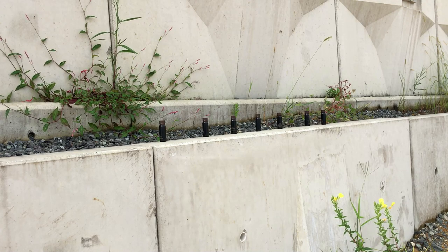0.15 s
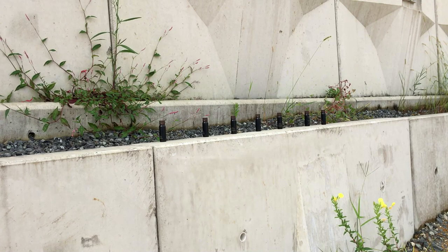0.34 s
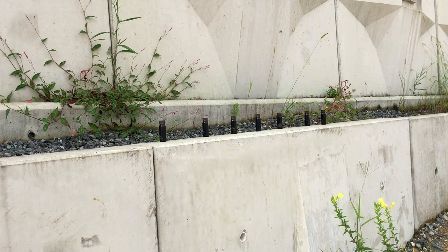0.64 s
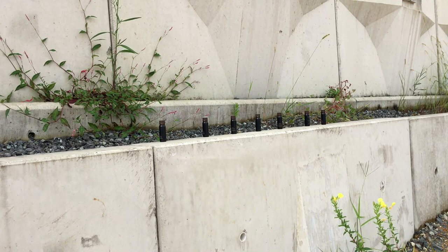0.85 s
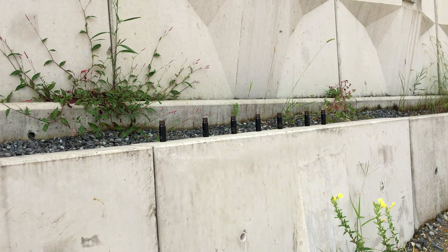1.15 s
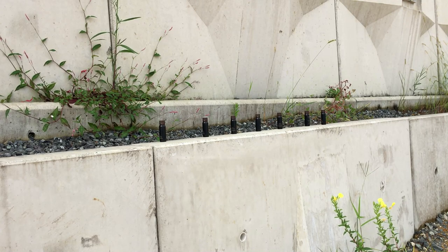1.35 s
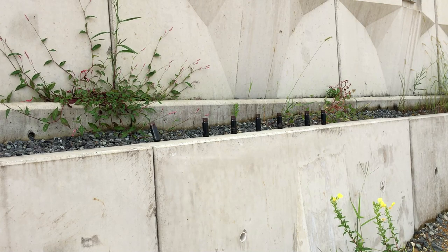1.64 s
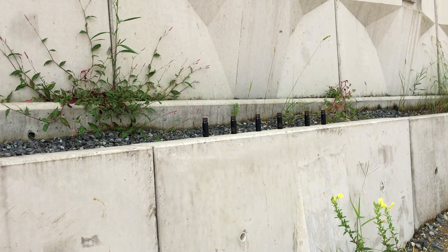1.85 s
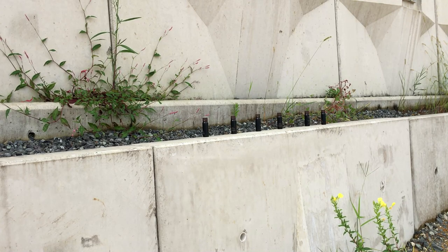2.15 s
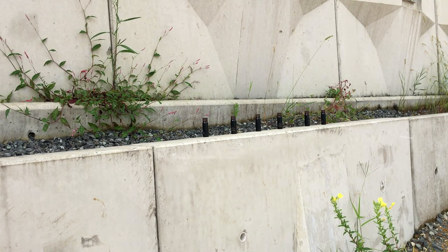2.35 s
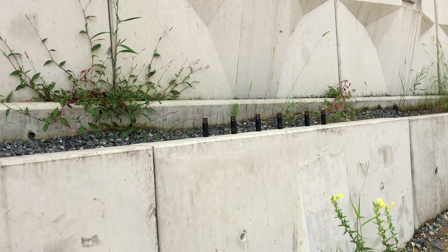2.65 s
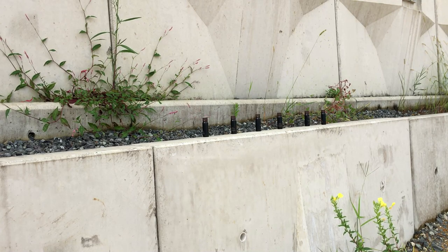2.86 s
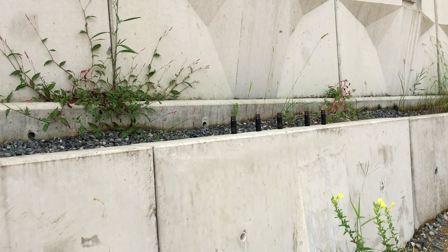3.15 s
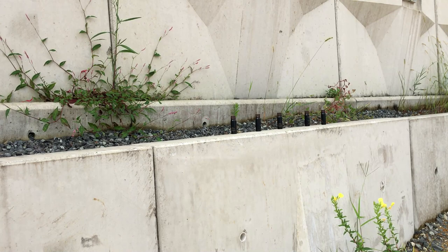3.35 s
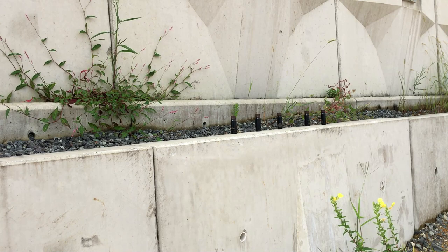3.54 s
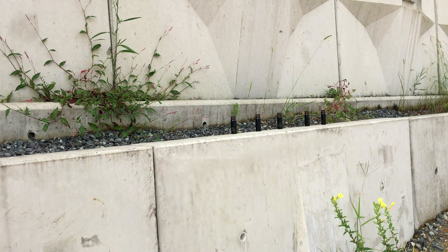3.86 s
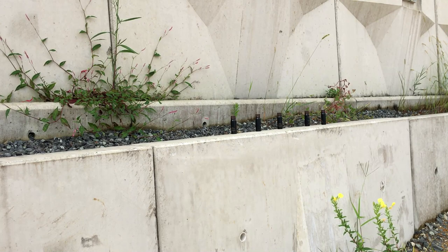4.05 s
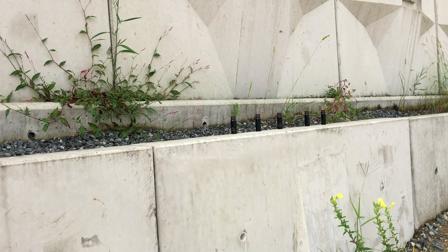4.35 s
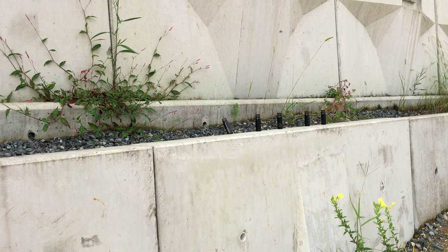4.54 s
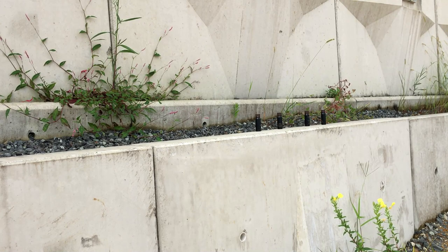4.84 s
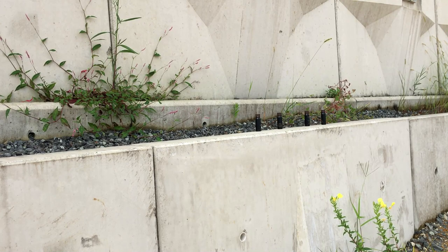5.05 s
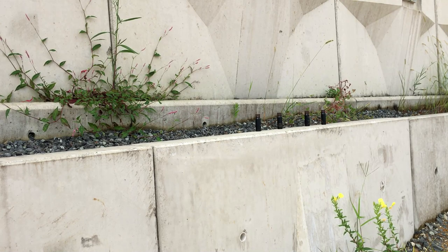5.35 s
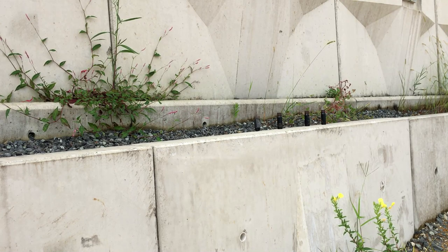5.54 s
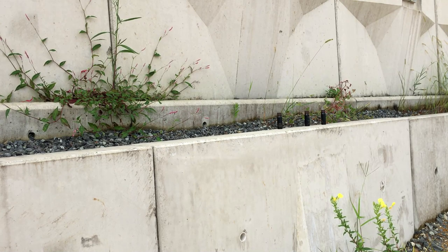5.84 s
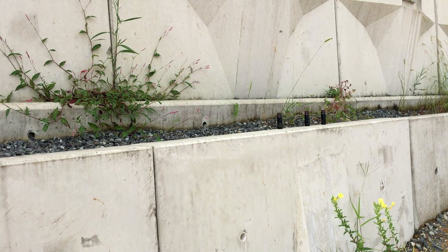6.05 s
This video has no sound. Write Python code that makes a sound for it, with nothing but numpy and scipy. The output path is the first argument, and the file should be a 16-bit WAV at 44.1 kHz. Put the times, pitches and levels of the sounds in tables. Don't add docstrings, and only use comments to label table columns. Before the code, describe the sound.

Short motor whirrs and hard plastic slams repeat at a distance; close pellet strikes snap on concrete and glass over faint town rumble and insects.

```python
import sys
import numpy as np
from scipy import signal
from scipy.fft import rfft, irfft
from scipy.io import wavfile
from scipy.ndimage import uniform_filter1d

SR = 44100
rng = np.random.default_rng(int(sys.argv[2]) if len(sys.argv) > 2 else 0)


def convert_level_to_amplitude(level_db):
    exponent = np.asarray(level_db, float) / 20
    return 10 ** exponent


def to_wav(sig):
    pcm = np.clip(np.atleast_2d(sig), -1, 1) * 32767
    pcm = np.round(pcm).astype(np.int16)
    wavfile.write(sys.argv[1], SR, pcm.T)


N = 273420
TIME = np.arange(N) / SR


def level(x, db):
    return x * convert_level_to_amplitude(db) / np.sqrt(np.mean(x ** 2))


def band(x, hz, width):
    return signal.lfilter(*signal.iirpeak(min(hz, SR / 2.2), hz / width, fs=SR), x)


def body(x, modes):
    out = 0
    for k, (hz, width, db) in enumerate(modes):
        strength = convert_level_to_amplitude(db) * np.sqrt(1000 / width)
        out = out + (-1) ** k * strength * band(x, hz, width)
    return out


def colour(points):
    hz, db = np.transpose(points)
    bins = np.arange(N // 2 + 1) * SR / N + 1
    gain = convert_level_to_amplitude(np.interp(np.log(bins), np.log(hz), db))
    return irfft(rfft(rng.standard_normal(N)) * gain, N)


def walk(rate):
    hold = int(SR / rate)
    steps = np.repeat(rng.standard_normal(N // hold + 1), hold)
    return uniform_filter1d(uniform_filter1d(steps, hold), hold)[:N]


def swells(rows):
    return sum(db * np.exp(-((TIME - s) / half) ** 2) for s, half, db in rows)


def add(out, s, piece):
    i = int(s * SR)
    out[..., i:i + piece.shape[-1]] += piece[..., :max(N - i, 0)]


def cycle(events, knocks, same=0.95, spark=0.75):
    push, t = np.zeros((4, N)), np.arange(4096) / SR
    shape_contact = spark * np.exp(-t / 0.0002)
    habit = rng.standard_normal((len(knocks), 4096))
    for s, db, *_ in events:
        for (delay, *parts, fade), usual in zip(knocks, habit):
            fresh = rng.standard_normal(4096)
            jolt = np.sqrt(min(same, 1)) * usual + np.sqrt(max(1 - same, 0)) * fresh
            shape = np.exp(-t / fade) + shape_contact
            add(push, s + delay, convert_level_to_amplitude(db + np.array(parts))[:, None] * jolt * shape)
    return push


# (time [s], peak level [dB])
SLAM_TIMES = [(0.9562, -17.5), (1.2783, -17), (1.515, -17), (2.395, -16.5), (2.7923, -16), (2.9908, -18),
              (3.6469, -17), (4.0261, -16.5), (4.4503, -16.5), (4.6578, -17.5), (5.2371, -17),
              (5.4429, -17.5), (6.1857, -16.5)]
# (time [s], peak level [dB], level of the rasp before it [dB])
LATCH_TIMES = [(0.881, -20.5, -14), (1.208, -20.5, -8), (1.4245, -20.5, -10.5), (1.6887, -21, -8.5),
               (2.503, -23, -11.5), (2.9062, -22, -7), (3.1054, -23.5, -4), (3.7493, -21, -15),
               (4.125, -22.5, -19), (4.563, -19, -12), (4.778, -20.5, -13.5), (5.3593, -22, -7),
               (5.5548, -20, -9)]
# (delay [s], stock [dB], receiver [dB], gearbox [dB], rattle [dB], fade [s])
SLAM_KNOCKS = [
    (-.006, -12, -17, -5, -10, .004),
    (-.0005, -6, -1, -4, -3, .007),
    (.007, -3, 0, -2, -4, .007),
    (.017, -1, -5, -9, -7, .008),
]
LATCH_KNOCKS = [
    (.0003, -12, -1, 0, -6, .005),
    (.008, -8, -4, -2, -6, .007),
    (.042, -15, -26, -30, -30, .014),
]
# (time [s], peak level [dB])
WALL_RETURNS = [(0.198, -43), (1.8248, -39), (1.8697, -45), (2.6237, -43.5), (3.2106, -46), (3.876, -40.5),
                (4.2493, -42), (4.8963, -39), (5.6702, -42)]
# (stock, receiver, gearbox, rattle [dB])
WALL_TILT_DB = [0, 2, -5, -8]


def gun_push():
    push = cycle(SLAM_TIMES, SLAM_KNOCKS) + cycle(LATCH_TIMES, LATCH_KNOCKS, same=.6, spark=2.5)
    echoes = cycle(WALL_RETURNS, LATCH_KNOCKS, same=.3, spark=.5)
    push += convert_level_to_amplitude(np.array(WALL_TILT_DB))[:, None] * echoes
    t = np.arange(1300) / SR
    part_db = np.array([[-10.], [-14.], [-6.], [3.]])
    for s, db, rasp_db in LATCH_TIMES:
        rasp = np.minimum(t / 0.019, 1) * rng.standard_normal(1300)
        add(push, s - 1300 / SR, convert_level_to_amplitude(db + rasp_db + part_db) * rasp)
    return push


# (frequency [Hz], width [Hz], level [dB])
STOCK_MODES = [(275, 30, -18.5), (430, 80, -13.5), (644, 21, -14), (944, 120, -8), (1092, 24, -9.5),
               (1203, 70, -5), (1537, 120, -11)]
RECEIVER_MODES = [(1950, 50, -7), (2090, 70, -10), (2230, 60, -5), (2330, 65, 1), (2500, 60, -10),
                  (2710, 80, -10)]
GEARBOX_MODES = [(3180, 180, -3.5), (3543, 130, -4), (3753, 116, -7.5), (4080, 280, -2.5),
                 (5300, 1800, -9.5), (6790, 980, -4.5)]
RATTLE_MODES = [(5560, 9700, -0.5), (8440, 1900, -4), (12900, 1400, -17)]


def gun():
    parts = (STOCK_MODES, RECEIVER_MODES, GEARBOX_MODES, RATTLE_MODES)
    return sum(body(push, modes) for push, modes in zip(gun_push(), parts)) + whirr()


# (start [s], length [s], level [dB])
MOTOR_RUNS = [(0, 0.063, -51), (.845, 0.14, -47), (1.005, 0.09, -55), (1.174, .15, -48), (1.363, 0.19, -49),
              (1.609, 0.1, -49.5), (2.347, 0.17, -47.5), (2.736, 0.2, -48.5), (2.946, .18, -48.5),
              (3.591, 0.17, -47), (3.981, 0.13, -47), (4.083, 0.055, -46.5), (4.415, 0.16, -48),
              (4.596, 0.21, -50), (5.142, 0.046, -59), (5.177, 0.23, -47.5), (5.392, 0.18, -48.5),
              (6.13, 0.059, -46.5)]
# (frequency [Hz], density [dB per Hz])
GEAR_SPECTRUM = [(350, -37.5), (600, -19.5), (1070, -7), (1450, -9.5), (2310, -10.5), (2910, -13.5),
                 (3160, -16), (6730, -17.5), (16000, -36)]


def whirr():
    spin_up_s, coast_s = .022, 0.036
    run = 0
    for start, length, db in MOTOR_RUNS:
        coast = np.exp(-np.maximum(TIME - start - length, 0) / coast_s)
        run = np.maximum(run, convert_level_to_amplitude(db) * np.clip((TIME - start) / spin_up_s, 0, 1) * coast)
    teeth = level(colour(GEAR_SPECTRUM), 0) * convert_level_to_amplitude(2.0 * walk(150))
    snags = rng.standard_normal(N) * convert_level_to_amplitude(6 * walk(60))
    hum = level(body(snags, STOCK_MODES[3:] + RECEIVER_MODES + GEARBOX_MODES), -5)
    return run * (teeth + hum)


# (time [s], spike level [dB], bending wave level [dB], fizz level [dB])
CONCRETE_STRIKES = [
    (1.081, -6.9, -37.2, -27.1),
    (1.4006, -7.5, -33.4, -20.6),
    (2.516, -11.6, -39.9, -34.0),
    (2.914, -4.2, -25.3, -30.6),
    (3.7712, -4.2, -25.6, -32.2),
    (4.1517, -3.7, -24.8, -30.4),
    (4.7824, -9.0, -35.6, -32.8),
    (5.3659, -6.1, -30.0, -29.8),
]


def concrete():
    spike_s, swing_s, swing_ratio = .000025, .00007, 3.7
    out, t = np.zeros(N), (np.arange(1024) - 8.3) / SR
    spike = ((t / spike_s) ** 2 - 1) * np.exp(-(t / spike_s) ** 2 / 2)
    late = np.maximum(t / swing_s, 1)
    swing = np.sin(np.pi * np.log(late) / np.log(swing_ratio))
    swing = swing * late ** -.6 * np.exp(-t / .003)
    fizz_fade = (t > 0) * (np.exp(-t / .0007) + .12 * np.exp(-t / 0.01))
    for s, spike_db, swing_db, fizz_db in CONCRETE_STRIKES:
        fizz = np.diff(rng.standard_normal(1025)) * fizz_fade
        hit = convert_level_to_amplitude(spike_db + 2) * spike + convert_level_to_amplitude(swing_db + 20) * swing + convert_level_to_amplitude(fizz_db) * fizz
        add(out, s - 8 / SR, hit)
    return out


def splinters(events, top=0.58, grit_s=0.012, grit_db=-26):
    out, t = np.zeros(N), np.arange(3000) / SR
    crack_fade = np.exp(-t / .0006)
    rebound_fade = np.exp(-t / .0005) + .6 * np.exp(-t / .0022)
    for s, db, hz, low_db, rebound_db in events:
        chance = rng.standard_normal((5, 3000))
        ring = band(band(chance[:2], hz, hz / 4), hz, hz / 4)
        low = convert_level_to_amplitude(low_db) * band(chance[2:4], 2500, 1700)
        bright = top * band(chance[:2], 13070, 5000) + 1.5 * ring + 2.2 * low
        bright = np.array([crack_fade, rebound_fade]) * bright
        crack, rebound = bright / abs(bright).max(axis=1, keepdims=True)
        grit = convert_level_to_amplitude(grit_db) * np.diff(chance[4], prepend=0) * np.exp(-t / grit_s)
        add(out, s - .0002, convert_level_to_amplitude(db) * (crack + grit))
        add(out, s + .0018, convert_level_to_amplitude(db + rebound_db) * rebound)
    return out


# (time [s], crack level [dB], ring [Hz], low part level [dB], rebound level [dB])
BOTTLE_HITS = [
    (.051, -5, 7600, -23, -8),
    (1.626, -4.5, 8900, -23, -1),
    (3.1031, -5.5, 6900, -30, 0),
    (4.5637, -4, 8600, -16, -2),
    (5.5564, -4.5, 9600, -18, -4),
]


def bottle_cracks():
    return splinters(BOTTLE_HITS)


# (time [s], frequency [Hz], level [dB], fade [s])
BOTTLE_TONES = [
    (.051, 400, -27, .0015),
    (.053, 3700, -29, .004),
    (1.627, 4640, -21, .004),
    (1.628, 2190, -33, .006),
    (3.104, 6890, -21, .003),
    (3.259, 3300, -38, .004),
    (4.5637, 500, -22, .002),
    (4.565, 3570, -28, .005),
    (5.5564, 500, -29, .002),
    (5.558, 3720, -28, .005),
]


def bottle_notes():
    out, t = np.zeros(N), np.arange(6000) / SR
    for s, hz, db, fade in BOTTLE_TONES:
        add(out, s, convert_level_to_amplitude(db) * np.sin(2 * np.pi * hz * t) * np.exp(-t / fade))
    scrape = band(rng.standard_normal(6000), 3760, 150) * np.exp(-t / .04)
    add(out, 4.145, convert_level_to_amplitude(-19) * scrape)
    return out


# (time [s], crack level [dB], ring [Hz], low part level [dB])
GRAVEL_BOUNCES = [(0.0978, -29.5, 9100, -28), (0.2127, -25.5, 5900, -2), (.2464, -43, 5900, 15),
                  (.383, -44, 4700, 14), (.5554, -48.5, 6220, -5), (1.1858, -29.5, 5000, -4),
                  (1.9001, -32.5, 6230, 24), (1.9192, -50, 6380, -11), (1.934, -42, 5950, 2),
                  (2.092, -49, 5070, -12), (2.9269, -27, 11600, -24.5), (3.1636, -35, 7150, -25),
                  (3.259, -26, 9250, -2), (3.435, -34, 9000, -0.5), (3.4858, -47, 6360, -17),
                  (3.5867, -38, 7443, 4), (3.8466, -38.5, 9400, -26), (4.1074, -33, 4500, -7),
                  (4.115, -38, 6500, 14), (4.6247, -29.5, 6260, -9), (4.6454, -35.5, 5180, -4),
                  (5.576, -20, 11800, -29), (5.619, -41, 10760, -18), (5.7893, -28.5, 4740, -13.5),
                  (5.867, -51, 6540, -6), (5.9104, -43, 6060, -3), (5.935, -41, 4580, -2),
                  (6.0405, -48.5, 4526, -8)]


def gravel_bounces():
    events = [(*row, -6) for row in GRAVEL_BOUNCES]
    return splinters(events, top=0.38, grit_s=0.0066, grit_db=-29)


def spray():
    out, t = np.zeros(N), np.arange(6000) / SR
    grains = rng.standard_normal(6000) * convert_level_to_amplitude(2.5 * rng.exponential(size=6000))
    shower = level(band(grains, 5000, 9000), -34)
    add(out, 4.113, shower * np.minimum(t / .015, 1) * np.exp(-(t / 0.066) ** 2))
    return out


def walls(near):
    t = np.arange(SR // 3) / SR
    wash = band(rng.standard_normal(len(t)), 2200, 2500) * np.exp(-t / .06) * np.minimum(t / .01, 1)
    return convert_level_to_amplitude(-52) * signal.fftconvolve(near, wash)[:N]


# (time [s], pulses [count], last pulse level [dB])
CRICKET_CHIRPS = [
    (1.853, 3, -49),
    (2.157, 4, -48.5),
]


def cricket():
    out, t = np.zeros(N), np.arange(560) / SR
    phase = 2 * np.pi * np.cumsum(4200 - 45000 * t) / SR
    tone = np.sin(phase) + .25 * np.sin(2 * phase) + .05 * np.sin(3 * phase)
    pulse = np.hanning(560) * tone
    pulse_gap_s, warm_up_db = .0203, -8
    for s, pulses, db in CRICKET_CHIRPS:
        for k in range(pulses):
            add(out, s + k * pulse_gap_s, convert_level_to_amplitude(db + warm_up_db / 2 ** k) * pulse)
    return out


# (time [s], length [s], start [Hz], end [Hz], level [dB])
BIRD_WHISTLES = [
    (5.62, .07, 4200, 7200, -69),
    (5.828, .05, 8500, 8300, -69),
    (5.88, .022, 5500, 5950, -67),
    (5.905, .055, 3700, 4600, -55),
]


def bird():
    out = np.zeros(N)
    for s, length, start_hz, end_hz, db in BIRD_WHISTLES:
        u = np.linspace(0, 1, int(length * SR))
        hz = end_hz + (start_hz - end_hz) * (1 - u) ** 2
        whistle = np.sin(2 * np.pi * np.cumsum(hz) / SR)
        add(out, s, convert_level_to_amplitude(db) * np.sin(np.pi * u) * whistle)
    return out


# (middle [s], half length [s], rise [dB])
CHORUS_SWELLS = [(.32, 0.091, 3.5), (0.644, 0.05, 6), (1.8, 0.31, 3.5), (2.3, 0.18, 2.5), (3.56, 0.1, 3.5),
                 (4.405, 0.045, 1), (4.984, 0.046, 4.5), (5.924, 0.21, 5)]


def insects():
    chorus = band(band(rng.standard_normal(N), 3800, 800), 3800, 800) * convert_level_to_amplitude(3.0 * walk(45))
    return level(chorus, -70.5) * convert_level_to_amplitude(swells(CHORUS_SWELLS))


# (middle [s], half length [s], rise [dB])
WIND_GUSTS = [(.03, .03, 7), (1.5, .2, 2), (2.25, .04, 5), (3.43, .1, 3), (4.15, .06, 4), (4.5, .05, 4),
              (4.86, .05, 5), (5.32, .07, 11), (5.47, .09, 11), (5.77, .03, 11), (5.94, .04, 9),
              (6.05, .07, 12)]


def wind():
    calm_db = -50.5
    rumble = band(band(rng.standard_normal(N), 55, 70), 60, 110) * convert_level_to_amplitude(3.0 * walk(12))
    return level(rumble, 0) * convert_level_to_amplitude(calm_db + swells(WIND_GUSTS))


# (frequency [Hz], density [dB per Hz])
TOWN_SPECTRUM = [(76, -33), (130, -14.5), (198, -4.5), (402, -11.5), (427, -10.5), (491, -14),
                 (1820, -24.5), (2770, -31), (3910, -36), (4590, -33.5), (7750, -41), (9480, -45.5),
                 (16000, -58)]


def town():
    hiss = colour(TOWN_SPECTRUM) * convert_level_to_amplitude(1.2 * walk(5))
    passing = 1 + 1.5 * np.exp(-((TIME - 4.4) / .1) ** 2)
    drone = band(rng.standard_normal(N), 197, 12) * passing
    return level(hiss, -54.5) + level(drone, -63.0)


def scene():
    near = gun() + concrete() + bottle_notes() + bottle_cracks() + gravel_bounces()
    animals = cricket() + bird() + insects()
    return (near + walls(near) + spray() + animals + wind() + town())[None]


def roll_off(x):
    return signal.sosfilt(signal.butter(12, 17140, fs=SR, output="sos"), x)


def record(dry):
    limited = signal.sosfilt(signal.ellip(7, .3, 45, 15800, fs=SR, output="sos"), dry)
    mix = signal.sosfilt(signal.butter(2, 30, "high", fs=SR, output="sos"), limited)
    return roll_off(mix)


dry = scene()
out = record(dry)
to_wav(out)
```